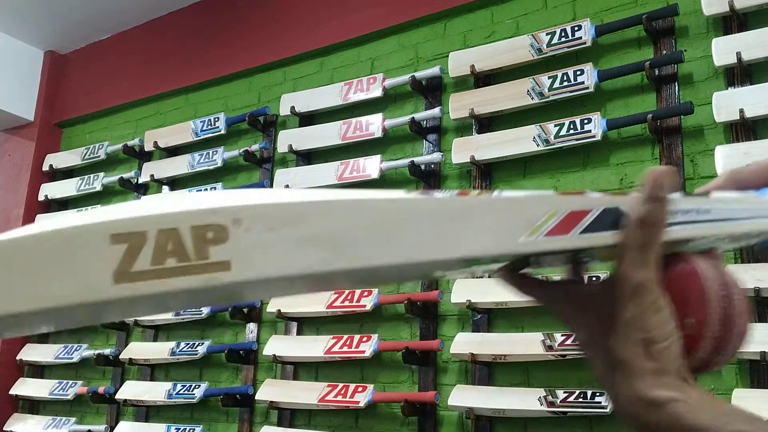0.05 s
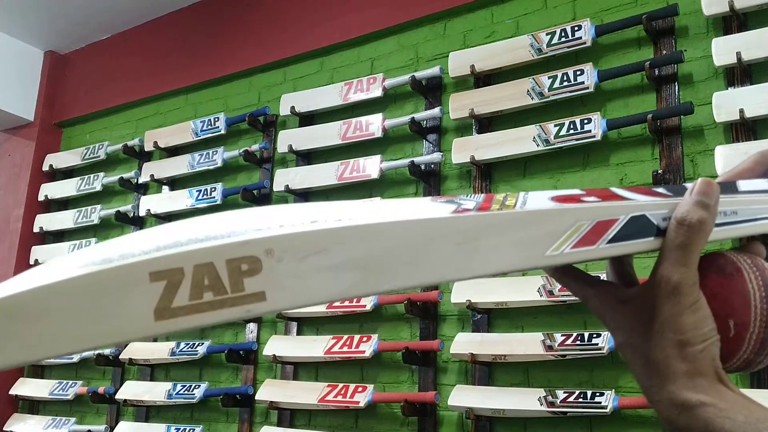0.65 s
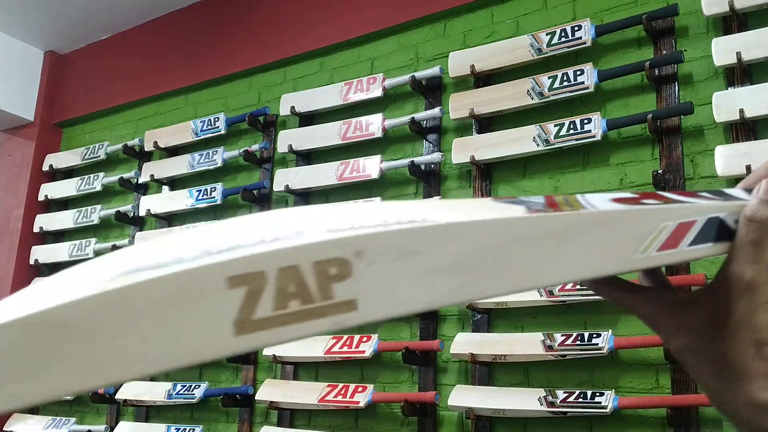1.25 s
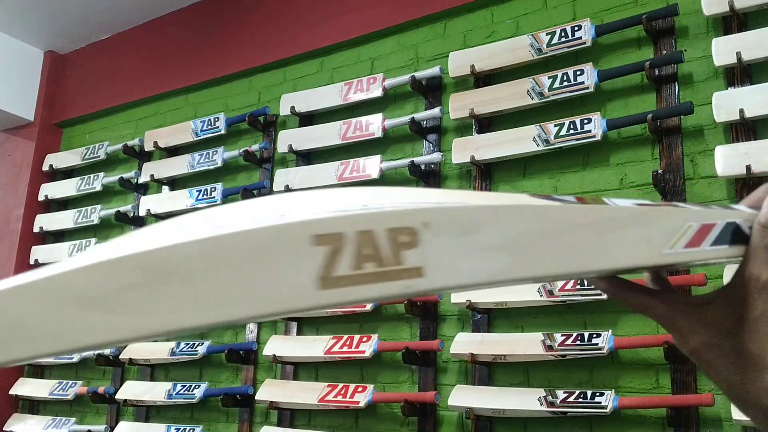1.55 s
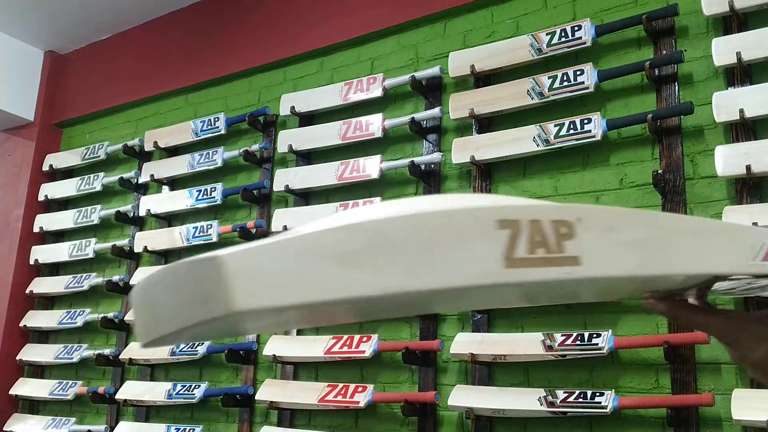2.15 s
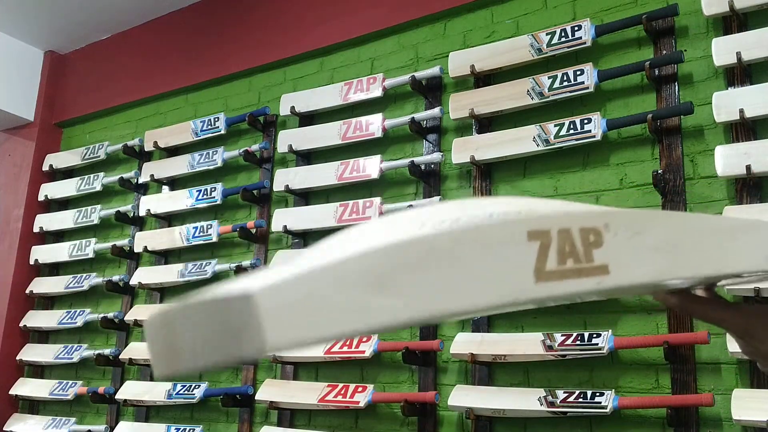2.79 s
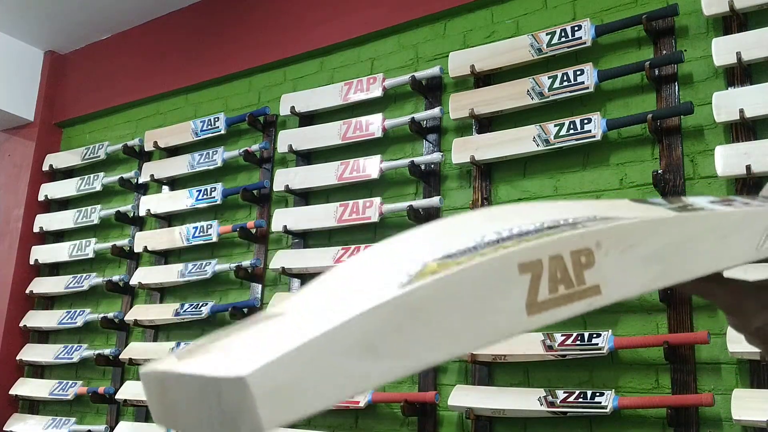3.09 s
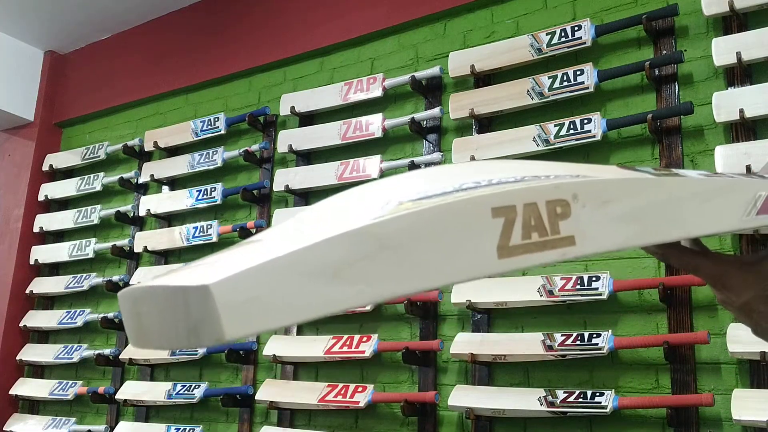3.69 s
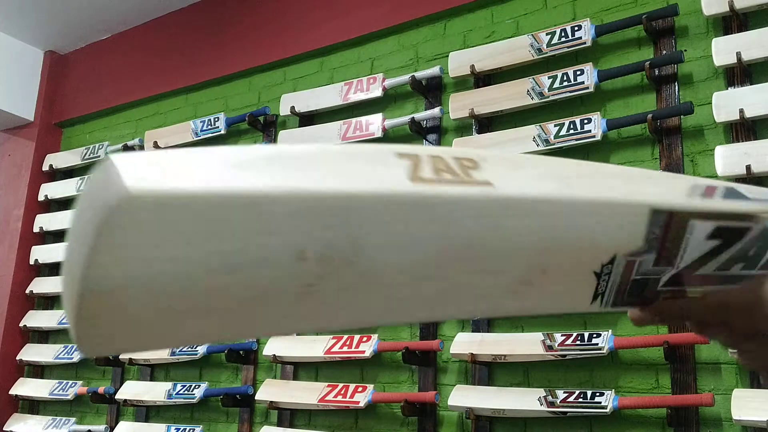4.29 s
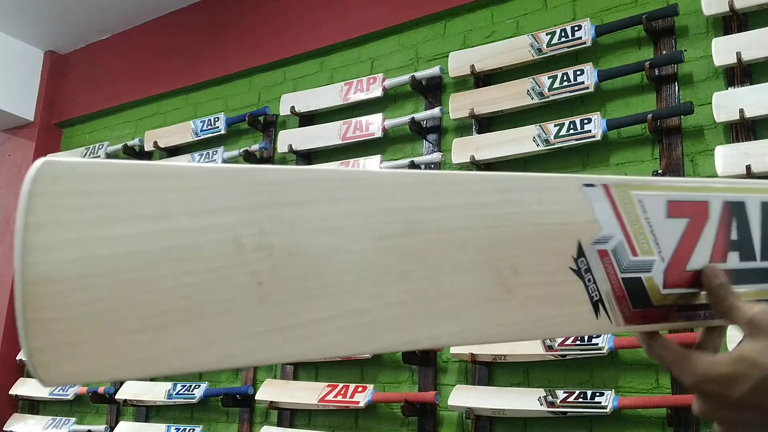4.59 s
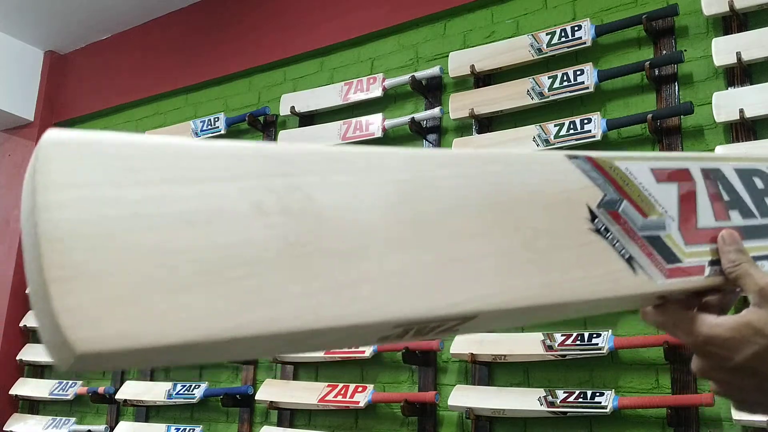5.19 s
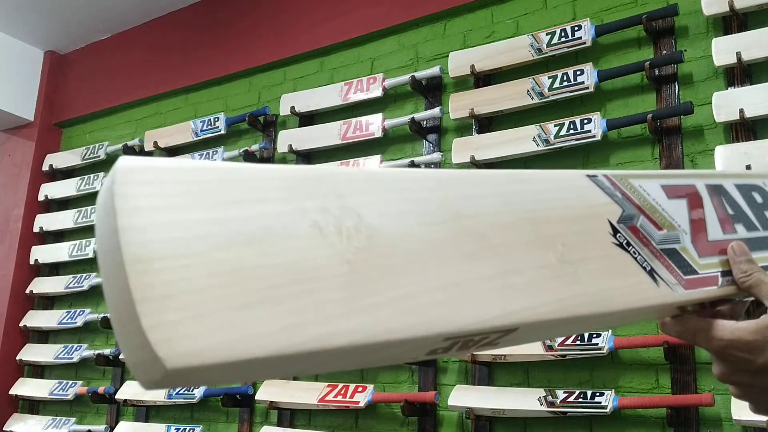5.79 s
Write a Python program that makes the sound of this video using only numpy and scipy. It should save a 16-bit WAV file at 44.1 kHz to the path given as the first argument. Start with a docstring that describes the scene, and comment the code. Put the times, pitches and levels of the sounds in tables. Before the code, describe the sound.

Two loud hisses of compressed air over a steady motor hum, with a few clicks and faint rubs of a handled wooden bat.

```python
"""A hard-walled shop, where a motor hums at harmonics of its shaft rate and fans beat against each other.
Two loud hissing blasts, most likely compressed air, fill the room: the turbulent jet roars as it meets
a surface and rings a hollow by resonance. A wooden bat is turned over in the hands, with faint
stick-slip rubs and a few clicks. Blasts, rubs and clicks reverberate; one faint tick stays dry.
A noise suppressor turns down whatever is weak."""
import sys
import numpy as np
from scipy import signal
from scipy.fft import rfft, irfft
from scipy.io import wavfile
from scipy.ndimage import uniform_filter1d

SR = 44100
rng = np.random.default_rng(int(sys.argv[2]) if len(sys.argv) > 2 else 0)


def write(x):
    x = np.atleast_2d(x).T
    wavfile.write(sys.argv[1], SR, np.round(np.clip(x, -1, 1) * 32767).astype(np.int16))


N = 257984
TIME = np.arange(N) / SR
BINS_HZ = np.fft.rfftfreq(N, 1 / SR)

# motor harmonics: multiple of the shaft rate, level/dB, share of the dip
MOTOR_HARMONICS = [(1, -52, .1), (2, -34, 1), (3, -38, 1), (4, -45.5, 0.032), (5, -57, .14), (6, -52.5, .3),
                   (7, -56, .03), (8, -42.5, .01)]
# dip of the hum: start/s, fall/s, hold/s, recovery/s, depth/dB
HUM_DIP = (3, 1.3, 1.5, 1, -10)
# fan pairs: f/Hz, level/dB, second fan re first/dB, beat rate/Hz, in step at t/s
FAN_PAIRS = [(80.2, -50, -2, 1.25, 2.15), (88.6, -51, -8, 1.5, .8), (94.7, -39.5, -2.5, 1.47, 1.0),
             (102.3, -50, -5, 1.5, .5), (213.6, -44.5, -14, .8, .7), (261.8, -54, -12, .9, .3),
             (392, -49.5, -12, .4, 4.4)]
# spectrum of the fans' rush: f/Hz, left level/dB, right level/dB
RUSH_SPECTRUM = [(20, -22.5, -13), (45.04, -14.5, -9), (75, -1, 5.5), (101.24, 0, 5), (139, -4.5, -1.5),
                 (204, -5.5, 3.5), (302.4, -14, -3.5), (610, -10, -5), (840, -14, -7.5),
                 (1340, -16.5, -9.5), (1720, -18, -11.5), (1874, -28, -12.5), (2755, -33.5, -24),
                 (3970, -38.5, -34), (16060, -49, -46)]
# likeness of the rush on the two sides: f/Hz, coherence
RUSH_COHERENCE = [(60, 0.7), (130, 0.8), (290, 0.95), (640, .72), (1000, 0.42), (1400, 0), (16000, 0)]
# air blasts: t/s, leak/s, held open/s, closing/s, jet/dB, splash/dB, ring/dB, whistle/dB
AIR_BLASTS = [(.079, .002, 0.13, .12, -12.5, -18, -17, -26),
              (3.192, 0.0077, 0.51, 0.12, -14.5, -10.5, -17.5, -21.5)]
# turbulence at the nozzle: f/Hz, level/dB
JET_SPECTRUM = [(100, -21.5), (300, -6), (1000, -5), (2500, -0.5), (4500, 0), (8000, 1.5), (10000, 0),
                (12000, -6.5), (16000, -10)]
# turbulence where the jet lands: f/Hz, level/dB
SPLASH_SPECTRUM = [(100, -22.5), (220, -13), (350, 0.5), (700, -2), (1200, 3.5), (2200, -0.5), (3500, -10),
                   (8000, -36.5), (16000, -44.5)]
# broad resonances of the hollow: f/Hz, width/Hz, level/dB
HOLLOW_HUMPS = [(640.4, 180, -2), (1130, 620, -6.5)]
# narrow modes of the hollow: f/Hz, relative level/dB
HOLLOW_MODES = [(377, -9), (433, -6), (503, -2), (564, -4), (608, -3), (674, -6), (694, -8), (766, -6),
                (836, -7), (900, 0), (1005, -10), (1221, -9), (1825, -9), (2179, -11)]
# whistle at the edge: f/Hz, width/Hz, level/dB
EDGE_TONES = [(905, 36, -1), (1170, 45, -10), (1825, 70, -14)]
# fingers sliding on the wood: t/s, duration/s, level/dB
RUB_STROKES = [(1.467, .05, -57.5), (4.928, .032, -56), (5.04, 0.052, -54), (5.11, .05, -58.5),
               (5.188, .085, -56), (5.276, 0.12, -52)]
# friction noise: f/Hz, level/dB
RUB_SPECTRUM = [(2000, -31.5), (6500, -16.5), (8200, -1.5), (9800, -0.5), (12000, -4.5), (16000, -4)]
# hard clicks in the hand: t/s, level/dB, left minus right/dB, room gain/dB
HAND_CLICKS = [(2.707, -35.5, -12, 9), (2.7268, -28, -9, 11), (2.733, -19, -11, 8), (2.7371, -19, -3, 7)]
# spectrum of a click: f/Hz, level/dB
CLICK_SPECTRUM = [(300, -21), (2500, -10), (3900, -11.5), (5000, -2.5), (9500, -0.5), (12000, -4.5),
                  (16000, -10)]
# reverberation time: f/Hz, T60/s
REVERB_TIMES = [(150, .6), (500, 0.77), (1500, 0.84), (3500, 0.71), (7000, 0.62), (10000, 0.56),
                (15000, .47)]
# balance of the diffuse field: f/Hz, left minus right/dB
REVERB_BALANCE = [(100, -0.5), (700, -5), (1500, -3), (8000, -5), (14000, 0.5)]
# suppressor threshold: f/Hz, level per bin/dB
GATE_THRESHOLD = [(500, -68), (2000, -64), (5000, -74), (10000, -82.5), (16000, -83)]


def gain_of(db):
    """Amplitude ratio: tenfold for each 20 dB."""
    return 10 ** (np.asarray(db) / 20)


def unit_rms(x):
    """Normalisation to unit mean power."""
    return x / np.sqrt(np.mean(x ** 2) + 1e-20)


def curve(points, hz=BINS_HZ, column=1):
    """Interpolation of a table column on a logarithmic frequency axis."""
    table = np.transpose(points)
    return np.interp(np.log(hz + 1), np.log(table[0] + 1), table[column])


def panned(x, left_db):
    """A level difference, left minus right, sets a source's direction."""
    return x * gain_of([[left_db / 2], [-left_db / 2]])


def noise(spectrum):
    """Linear filtering: white noise takes on an amplitude spectrum, at rms 1."""
    return unit_rms(irfft(rfft(rng.standard_normal(N)) * spectrum, N))


def wander(rate_hz):
    """Random modulation: low-pass noise of rms 1."""
    return noise(1 / (1 + (BINS_HZ / rate_hz) ** 4))


def envelope(start, attack, hold, release):
    """Trapezoidal envelope from 0 to 1 and back, all times in s."""
    t = TIME - start
    return np.clip(np.minimum(t / attack, 1 - (t - attack - hold) / release), 0, 1)


def resonances(rows):
    """Damped resonators (f/Hz, width/Hz, level/dB) add in power to give an amplitude spectrum."""
    power = 0
    for hz, width, db in rows:
        detuning = (BINS_HZ ** 2 - hz ** 2) / (width * (BINS_HZ + 1))
        power += gain_of(db) ** 2 / (1 + detuning ** 2)
    return np.sqrt(power)


def coherent_pair(coherence):
    """Partial coherence: left and right noise spectra share a common part."""
    common, separate = rfft(rng.standard_normal((2, N)))
    return np.array([common, coherence * common + np.sqrt(1 - coherence ** 2) * separate])


def reverberation(level, spectrum, early_db=3, early_s=.03, delay_s=.003, spacing_m=.14):
    """Diffuse field: a noisy source's power lingers, each band decaying exponentially at its own rate."""
    coherence = np.sinc(2 * BINS_HZ * spacing_m / 343)  # shared bass, unrelated treble
    field = unit_rms(irfft(coherent_pair(coherence) * spectrum, N))
    hz, t, bands = signal.stft(field, SR, nperseg=256, noverlap=192)
    source_power = np.interp(t - delay_s, TIME, uniform_filter1d(level ** 2, size=128), 0, 0)
    lag = t[t < 1]
    decay = gain_of(-60 * lag / curve(REVERB_TIMES, hz)[:, None]) ** 2
    decay *= 1 + gain_of(early_db) ** 2 * np.exp(-lag / early_s)  # the near walls answer first
    decay /= decay.sum(1, keepdims=True)
    power = signal.fftconvolve(source_power[None], decay, axes=1)[:, :len(t)]
    balance = gain_of(np.outer([.5, -.5], curve(REVERB_BALANCE, hz)))[..., None]
    return signal.istft(bands * balance * np.sqrt(abs(power)), SR, nperseg=256, noverlap=192)[1][:, :N]


def noise_in_room(level, spectrum, direct_db, room_db, left_db):
    """Superposition of a noise source's direct and reverberant fields."""
    direct = panned(gain_of(direct_db) * level * noise(spectrum), left_db)
    return direct + gain_of(room_db) * reverberation(level, spectrum)


def tone(cycles, waver=.1, waver_hz=3):
    """A sine of rms about 1 under slight amplitude and phase modulation."""
    amplitude = np.sqrt(2) * (1 + waver * wander(waver_hz))
    return amplitude * np.sin(2 * np.pi * cycles + waver * wander(waver_hz))


def motor_hum(shaft_hz=59.42):
    """Periodic rotation gives a harmonic series; the second and third harmonics sink most in the dip."""
    *timing, depth_db = HUM_DIP
    dip_db = depth_db * envelope(*timing)
    hum = sum(gain_of(db + share * dip_db) * tone(harmonic * shaft_hz * TIME + rng.random())
              for harmonic, db, share in MOTOR_HARMONICS)
    return panned(hum, left_db=-5)


def fan_tones():
    """Beats: blade tones of fans at nearly the same speed throb at their difference frequency."""
    tones = np.zeros(N)
    for hz, db, second_db, beat_hz, in_step_s in FAN_PAIRS:
        cycles = hz * TIME + rng.random()
        second_cycles = cycles + beat_hz * (TIME - in_step_s)
        tones += gain_of(db) * (tone(cycles) + gain_of(second_db) * tone(second_cycles))
    return panned(tones, left_db=-4)


def fan_rush(midband_db=-43.5, gust_db=.9, gust_hz=5):
    """Turbulence in the moving air makes a dull broadband rush, brighter on the right."""
    spectra = coherent_pair(curve(RUSH_COHERENCE))
    spectra *= gain_of([curve(RUSH_SPECTRUM, column=1), curve(RUSH_SPECTRUM, column=2)])
    midband = irfft(spectra.mean(0) * (BINS_HZ > 550) * (BINS_HZ < 2000), N)
    return gain_of(midband_db + gust_db * wander(gust_hz)) * irfft(spectra, N) / midband.std()


def valve_levels(start, leak_s, held_s, closing_s, jet_db, splash_db, ring_db, whistle_db,
                 opening_s=.002, leak_db=-3, spit_db=4, spit_s=.014, splash_db_per_s=42.5,
                 ring_build_s=.07, whistle_build_s=.18):
    """A valve leaks, snaps open and eases shut; four amplitudes follow power laws of its opening."""
    opens = start + leak_s
    age = np.maximum(TIME - opens, 0)
    opening = envelope(opens, opening_s, held_s, closing_s)
    leak = gain_of(leak_db) * envelope(start, opening_s, leak_s - opening_s, opening_s)
    spit = gain_of(spit_db * np.exp(-age / spit_s))  # the stored pressure escapes first
    jet = gain_of(jet_db) * (leak + spit * opening ** 1.6)
    splash = gain_of(splash_db - splash_db_per_s * age) * opening  # strongest as the jet first lands
    ring = gain_of(ring_db) * (1 - np.exp(-age / ring_build_s)) * opening ** .41
    whistle = gain_of(whistle_db) * (1 - np.exp(-age / whistle_build_s)) * opening
    return np.array([jet, splash, ring, whistle])


def air_blasts(flutter_db=2.5, flutter_hz=70, mode_width_hz=2.3, mode_gain_db=13):
    """A turbulent jet hisses, splashes on a surface, excites a hollow's modes and whistles at its edge."""
    narrow_modes = [(hz, mode_width_hz, db + mode_gain_db) for hz, db in HOLLOW_MODES]
    spectra = (gain_of(curve(JET_SPECTRUM)), gain_of(curve(SPLASH_SPECTRUM)),
               resonances(list(HOLLOW_HUMPS) + narrow_modes), resonances(EDGE_TONES))
    flutter = gain_of(flutter_db * wander(flutter_hz))  # the jet flaps
    levels = sum(valve_levels(*blast) for blast in AIR_BLASTS) * flutter
    return sum(noise_in_room(level, spectrum, direct_db=-13, room_db=-1.47, left_db=-10)
               for level, spectrum in zip(levels, spectra))


def finger_rubs(press_s=.008, lift_s=.02, fade_db_per_s=40, slip_db=4, slip_hz=250):
    """Stick-slip friction of skin on smooth wood gives short strokes of thin, grainy hiss."""
    strokes = np.zeros(N)
    for start, duration, db in RUB_STROKES:
        slowing = gain_of(db - fade_db_per_s * np.maximum(TIME - start, 0))
        strokes += slowing * envelope(start, press_s, duration - press_s - lift_s, lift_s)
    slips = unit_rms(gain_of(slip_db * wander(slip_hz)))
    spectrum = gain_of(curve(RUB_SPECTRUM))
    return noise_in_room(strokes * slips, spectrum, direct_db=-7, room_db=-2, left_db=-4)


def hand_clicks(decay_s=.0003):
    """A brief impulse has a broad spectrum: each bright snap of about a millisecond excites the room."""
    direct, to_room = np.zeros((2, N)), np.zeros(N)
    spectrum = gain_of(curve(CLICK_SPECTRUM))
    for start, db, left_db, room_db in HAND_CLICKS:
        decay = np.exp(-np.minimum(abs(TIME - start) / decay_s, 20))
        snap = gain_of(db) / 2 * (TIME >= start) * decay
        direct += panned(snap, left_db)
        to_room += gain_of(room_db) * snap
    return direct * noise(spectrum) + reverberation(to_room, spectrum)


def dry_tick(start=4.2772, level_db=-30.5, settle_s=.001):
    """Exponential relaxation: a small sudden step settles at once, with no reverberation."""
    decay = np.exp(-np.minimum(abs(TIME - start) / settle_s, 30))
    return panned(gain_of(level_db) * (TIME >= start) * decay, left_db=-5)


def noise_suppressor(x, depth_db=15, knee_db=2):
    """Spectral gating turns down faint bands, which dulls the fans and shortens the tails."""
    hz, _, bands = signal.stft(x, SR, nperseg=1024, noverlap=768)
    power = uniform_filter1d(abs(bands) ** 2, size=5, axis=1)  # smoothed over frequency
    power = uniform_filter1d(power, size=5, axis=2)  # and over time
    power_db = 10 * np.log10(abs(power) + 1e-16)
    faint = .5 + .5 * np.tanh((curve(GATE_THRESHOLD, hz)[:, None] - power_db) / knee_db)
    return signal.istft(bands * gain_of(-depth_db * faint), SR, nperseg=1024, noverlap=768)[1][:, :N]


def scene():
    """Superposition: the pressures of the shop's sources add."""
    return air_blasts() + hand_clicks() + finger_rubs() + motor_hum() + fan_tones() + fan_rush()


def record(dry, cutoff_hz=15950):
    """The gated sound and the tick are limited to full scale, then low-pass filtered."""
    limited = np.clip(noise_suppressor(dry) + dry_tick(), -1, 1)
    low_pass = signal.firwin(511, cutoff_hz, window=("kaiser", 9), fs=SR)
    return signal.oaconvolve(limited, low_pass[None], "same")


dry = scene()
out = record(dry)
write(out)
```